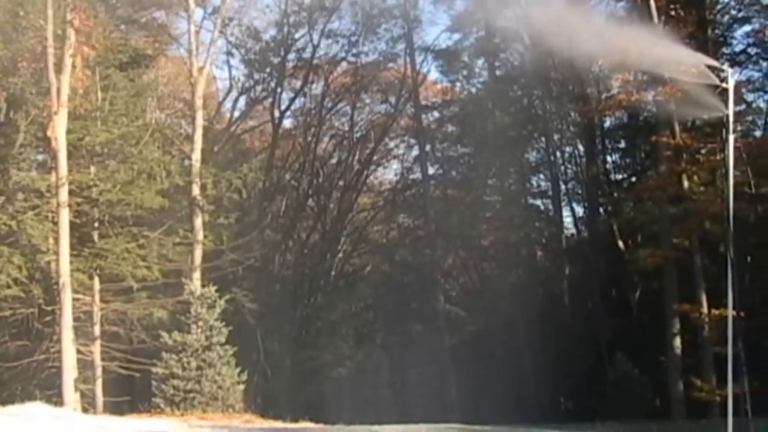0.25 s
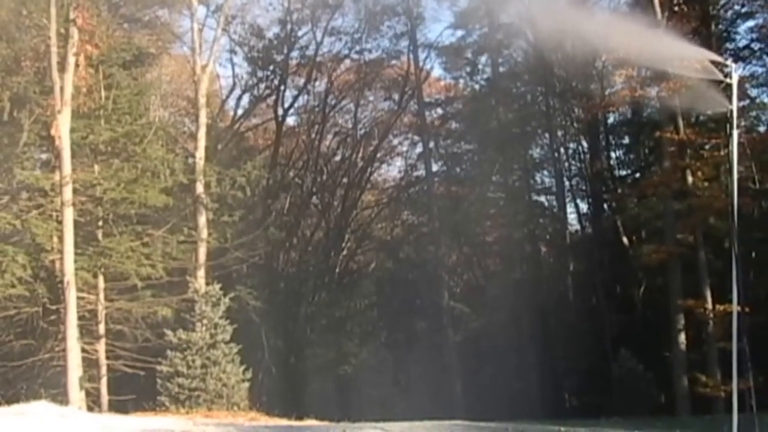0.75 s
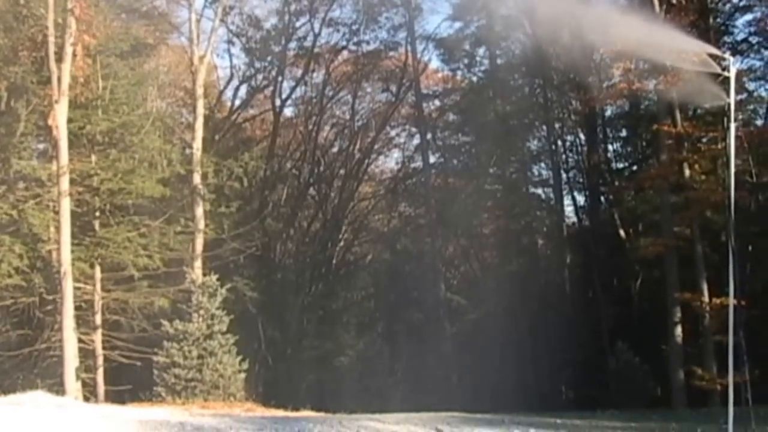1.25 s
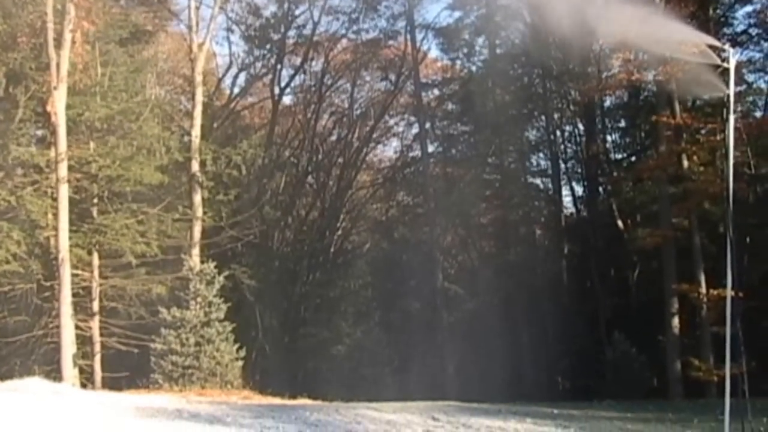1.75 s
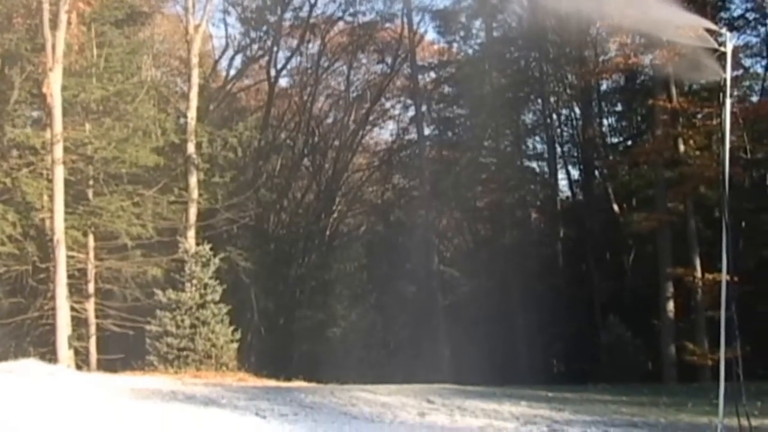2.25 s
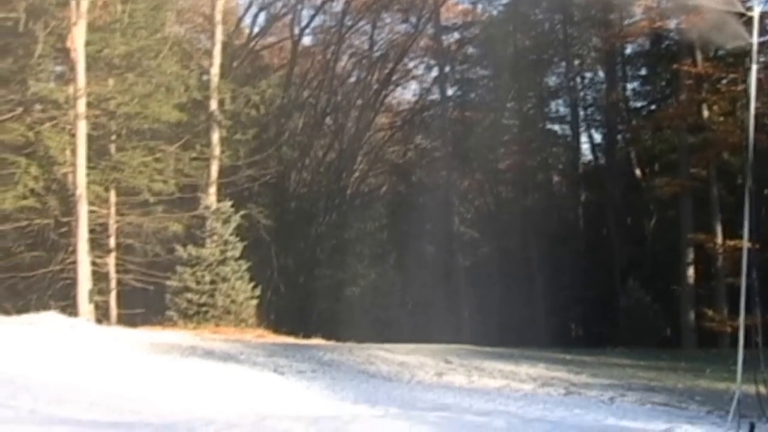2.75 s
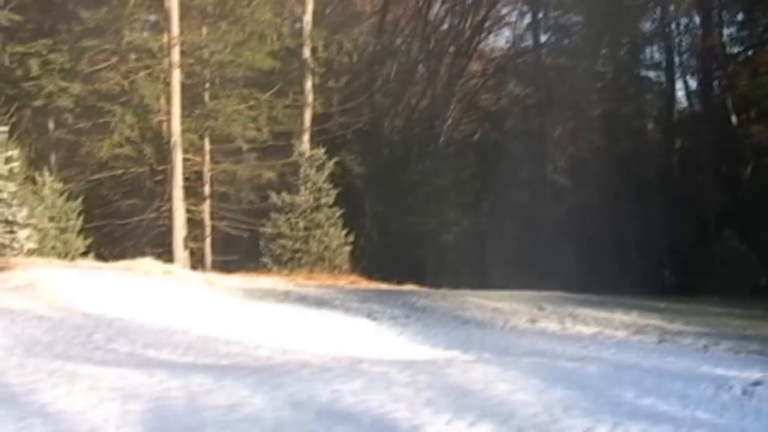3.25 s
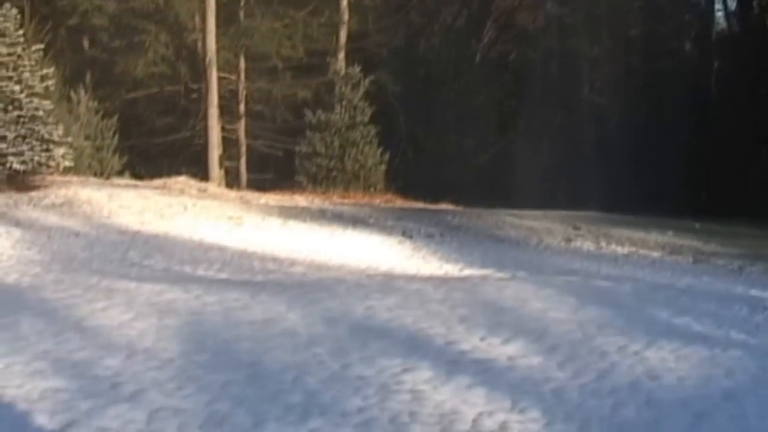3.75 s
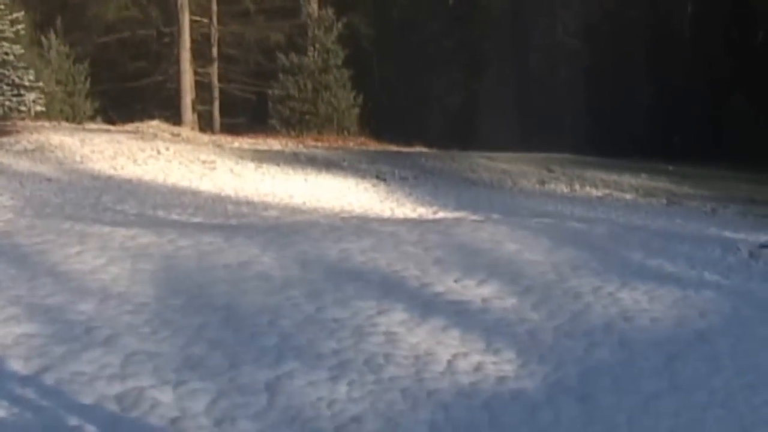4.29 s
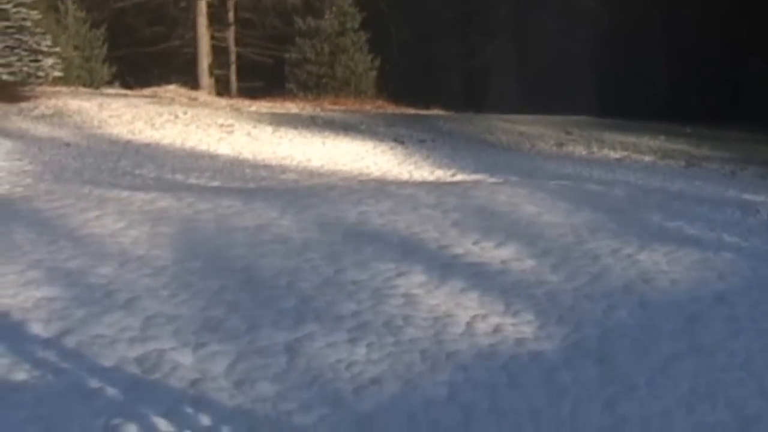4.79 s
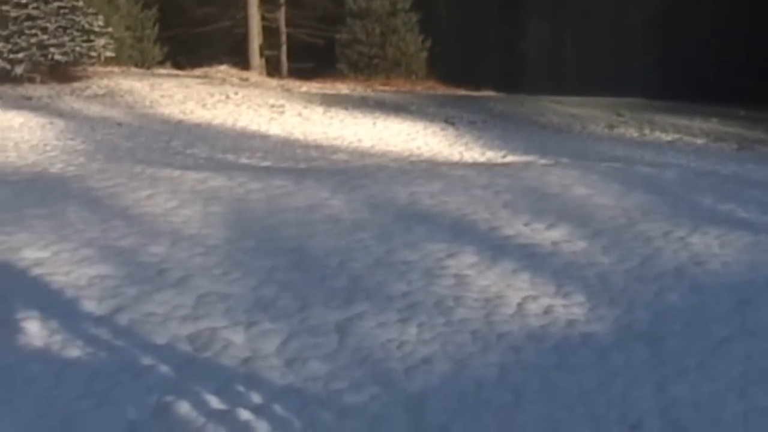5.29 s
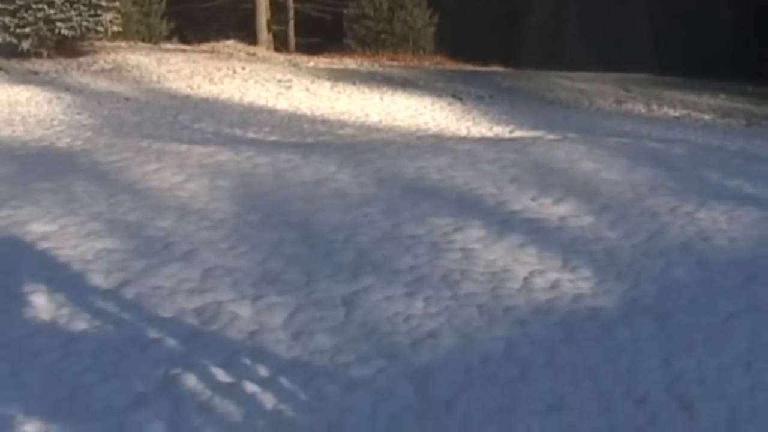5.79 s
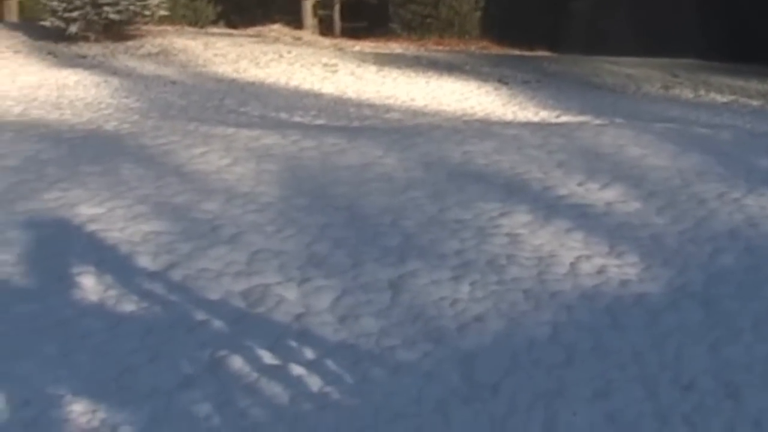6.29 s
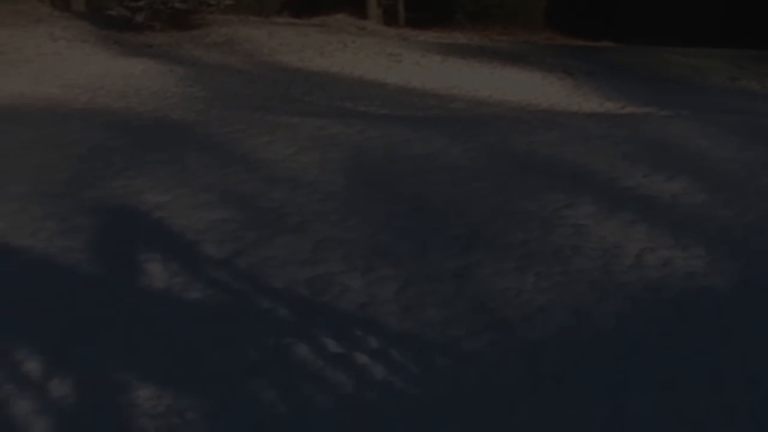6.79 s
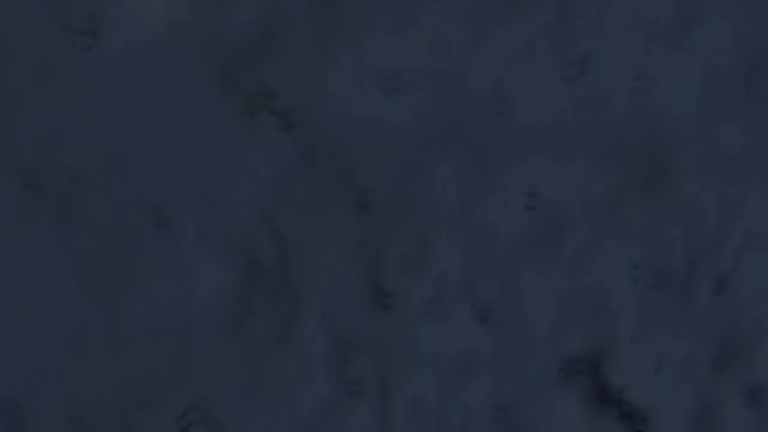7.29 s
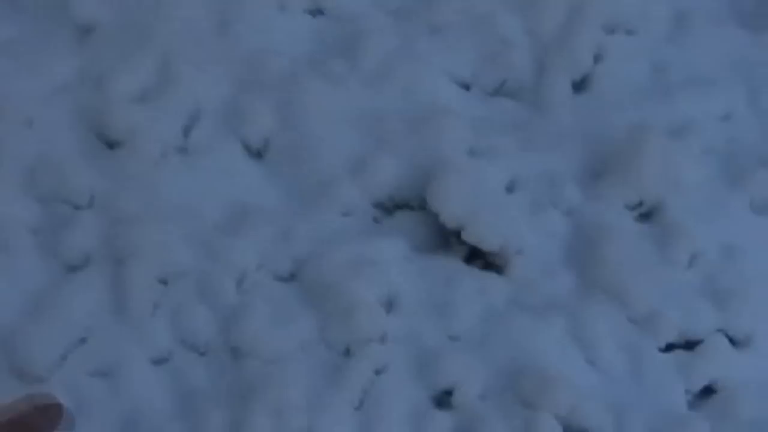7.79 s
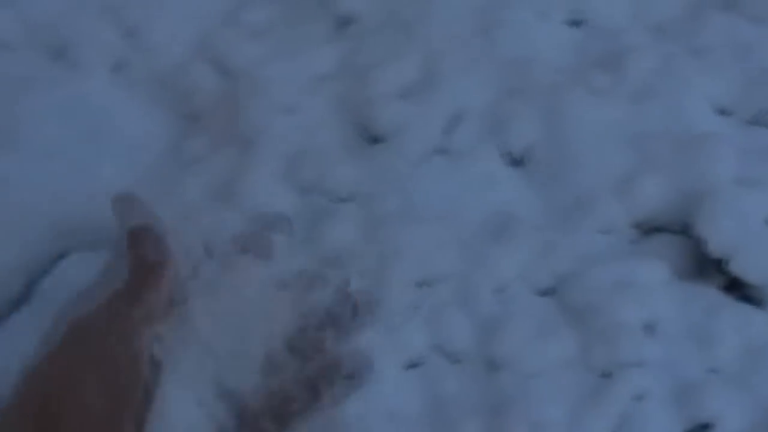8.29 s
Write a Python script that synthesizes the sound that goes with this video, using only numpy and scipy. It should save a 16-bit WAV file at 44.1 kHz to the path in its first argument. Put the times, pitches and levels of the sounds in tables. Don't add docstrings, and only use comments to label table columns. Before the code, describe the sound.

A snowmaking jet hisses loudly and steadily outdoors over faint machine hum, then a boot crunches packed snow and a finger taps the crust.

```python
import sys
import numpy as np
from scipy import signal
from scipy.io import wavfile
from scipy.ndimage import map_coordinates

SR = 44100
rng = np.random.default_rng(int(sys.argv[2]) if len(sys.argv) > 2 else 0)


def makeup_ratio(level_db):
    decades = np.asarray(level_db, float) / 20
    return 10 ** decades


def bounce(signal):
    frames = np.transpose(np.atleast_2d(signal))
    limited = np.clip(frames, -1, 1)
    pcm = np.round(limited * 32767).astype(np.int16)
    wavfile.write(sys.argv[1], SR, pcm)


N = 376613
FRAME, HOP = 1024, 256
RING = 1500


def in_time(rows, s):
    at, *columns = np.transpose(rows)
    return [np.interp(s, at, c) for c in columns]


def at_hz(rows, hz):
    at, *columns = np.transpose(rows)
    return np.array([np.interp(np.log(hz + 1), np.log(at), c) for c in columns])


def drift(rate, count, size, step):
    r = np.exp(-2 * np.pi * rate * step / SR)
    noise = rng.standard_normal((count, size + 300))
    slow = signal.lfilter([1], [1, -2 * r, r * r], noise)[:, 300:]
    return slow / slow.std(axis=1, keepdims=True)


def ring(height, hz, t60, attack):
    t = np.arange(RING) / SR
    swing = height * np.sin(2 * np.pi * hz * t)
    return swing * makeup_ratio(-60 * t / t60) * (1 - np.exp(-t / attack))


def add_at(out, s, knock):
    out[round(s * SR):][:RING] += knock


def wavering_tones(lines):
    frame = np.arange(N) / HOP
    waver = drift(0.88, count=len(lines), size=N // HOP + 2, step=HOP)
    out = 0
    for (cycles, db), row, start in zip(lines, waver, rng.random(len(lines))):
        waver_db = 1.2 * np.interp(frame, np.arange(len(row)), row)
        out = out + makeup_ratio(db + waver_db) * np.sin(2 * np.pi * (cycles + start))
    return np.sqrt(2) * out


def stereo_noise(shape):
    noise = rng.standard_normal((3, N))
    hz, s, (direct, left, right) = signal.stft(noise, SR, nperseg=FRAME, noverlap=FRAME - HOP)
    level_db, balance_db, lag, alike = shape(hz, s)
    alike = np.clip(alike, 0, 1)
    left = np.sqrt(alike) * direct * np.exp(-.5j * lag) + np.sqrt(1 - alike) * left
    right = np.sqrt(alike) * direct * np.exp(.5j * lag) + np.sqrt(1 - alike) * right
    both = np.array([left * makeup_ratio(level_db + balance_db / 2), right * makeup_ratio(level_db - balance_db / 2)])
    return signal.istft(both, SR, nperseg=FRAME, noverlap=FRAME - HOP)[1][:, :N]


# f/Hz, left level/dB, right level/dB
WHINE = [(15068, -57, -66), (15135, -58, -66), (15218, -55, -58), (15285, -53, -53), (15367, -53, -54),
         (15435, -57, -54)]


def electronics_whine():
    t = np.arange(N) / SR
    out = 0
    for hz, left, right in WHINE:
        tone = np.sin(2 * np.pi * (hz * t + rng.random((2, 1))))
        out = out + np.sqrt(2) * makeup_ratio([[left], [right]]) * tone
    return out


# f/Hz, level per Hz/dB
YARD = [(15, -10), (25, 0), (48, -2), (85, -2.5), (130, -5.5), (200, 0.5), (299, -2.5), (370, -16),
        (520, -32), (880, -90)]
YARD_DB = -45.5


def yard_shape(hz, s):
    alike = np.clip(hz / 170 - .15, .02, .5)
    return at_hz(YARD, hz)[0][:, None], 0, 0, alike[:, None]


def yard():
    rumble = stereo_noise(yard_shape)
    return makeup_ratio(YARD_DB) * rumble / rumble.std()


# f/Hz, level/dB
HUM = [(100.3, -55.5), (200.4, -59.5)]


def transformer():
    t = np.arange(N) / SR
    return wavering_tones([(hz * t, db) for hz, db in HUM])


# t/s, strokes per second/Hz
STROKES = [(0, 25.2), (2.05, 23.9), (2.7, 24.8), (3.3, 23.15), (3.96, 23), (4.9, 23.75), (7.05, 23.8),
           (7.07, 23.2), (8.54, 21)]
# multiple, level/dB
PUMP_ORDERS = [(3, -69), (5, -57), (6, -52), (7, -55.5), (8, -56.5), (9, -59), (11, -65)]


def compressor():
    turns = np.cumsum(in_time(STROKES, np.arange(N) / SR)[0]) / SR
    return wavering_tones([(k * turns, db) for k, db in PUMP_ORDERS])


# t/s, level/dB, f/Hz, time to fade by 60 dB/s
TAP = (8.2773, -19, 1050, .012)


def finger_tap():
    out = np.zeros(N)
    s, db, hz, t60 = TAP
    click = ring(makeup_ratio(db + 4.5), hz, t60, attack=.0004)
    soft_give = ring(makeup_ratio(db - 1), 240, t60=.015, attack=.0004)
    add_at(out, s, soft_give - click)
    return out


SETTLE_S, SETTLE_DB, SETTLE_HZ = 0.0059, -8.5, 260
CRACK_DB, CRACK_DB_PER_S = -5.5, -14
CRUMBLE_DB, CRUMBLE_T60_S = -27.5, 0.1
# t/s, level/dB, f/Hz
SLIPS = [(7.385, -12, 260), (7.4134, -12, 320), (7.4187, -12, 270), (7.426, -16, 400), (7.4392, -14, 320),
         (7.4532, -11, 480), (7.4808, -12, 350), (7.4983, -12.6, 300), (7.507, -11.2, 470),
         (7.511, -10.5, 320), (7.5192, -16, 280), (7.5319, -14, 300), (7.5456, -8, 230), (7.6003, -12, 170),
         (7.6152, -12, 370), (7.629, -11, 370), (7.6459, -12, 290), (7.656, -9, 290), (7.667, -9, 330),
         (7.678, -10, 340), (7.6932, -13, 310), (7.7, -12, 370), (7.7098, -9, 280), (7.7221, -13, 420),
         (7.7502, -6.5, 285), (7.762, -16, 320), (7.7903, -8, 285), (7.8405, -12, 340), (7.8453, -16, 420),
         (7.8903, -10.5, 280)]


def boot():
    out, kicks = np.zeros(N), np.zeros(N)
    for (s, db, hz), chance in zip(SLIPS, rng.standard_normal((len(SLIPS), 4))):
        crack_db = db + CRACK_DB + CRACK_DB_PER_S * (s - SLIPS[0][0]) + 3.3 * chance[0]
        crack_hz = 780 * np.exp(0.23 * chance[1])
        later = s + SETTLE_S * np.exp(0.305 * chance[2])
        settle_db = db + SETTLE_DB + 2.5 * chance[3]
        add_at(out, s, ring(makeup_ratio(db), hz, t60=4.0 / hz, attack=0.00039))
        add_at(out, s, ring(makeup_ratio(crack_db), crack_hz, t60=0.0093, attack=0.00023))
        add_at(out, later, ring(makeup_ratio(settle_db), SETTLE_HZ, t60=3.7 / SETTLE_HZ, attack=0.00039))
        kicks[round(s * SR)] = makeup_ratio(db)
    out = signal.sosfilt(signal.butter(3, 155, "high", fs=SR, output="sos"), out)
    grains = (rng.random(N) < 300 / SR) * rng.standard_normal(N)
    grains = signal.sosfilt(signal.butter(2, [180, 900], "band", fs=SR, output="sos"), grains)
    trickle = signal.lfilter([1], [1, -makeup_ratio(-60 / (CRUMBLE_T60_S * SR))], kicks + 1e-18)
    return out + makeup_ratio(CRUMBLE_DB) * trickle * grains / grains.std()


# changes per second/Hz, level shared by all pitches/dB, level in patches/dB
SPUTTER = [
    (14, .5, .5),
    (35, 0.46, .5),
]
# f/Hz, share 0-1
SPUTTER_DEPTH = [(300, .1), (2000, 0.088), (4500, 0.49), (8000, 0.93), (15000, 0.57)]


def sputter(hz, s):
    patch = np.linspace(0, 23, len(hz))
    grid = np.meshgrid(patch, np.arange(len(s)), indexing="ij")
    sputter_db = 0
    for rate, shared_db, patchy_db in SPUTTER:
        rows = drift(rate, count=25, size=len(s), step=HOP)
        patches = map_coordinates(rows[1:], grid, order=1)
        sputter_db = sputter_db + shared_db * rows[0] + patchy_db * patches
    return at_hz(SPUTTER_DEPTH, hz)[0][:, None] * sputter_db


PALM_S, PALM_WIDTH_S, PALM_MS, PALM_DB, PALM_HZ = 8.3, .07, 1.48, 6.5, 8500


def palm_mirror(pitch, s):
    palm = np.exp(-((s - PALM_S) / PALM_WIDTH_S) ** 2 - ((pitch - PALM_HZ) / 2500) ** 2)
    return PALM_DB * palm * np.cos(2 * np.pi * pitch * PALM_MS / 1000 + 1.0)


BOUNCE_LEFT = 1.2
STILL_AIR = 0.29
SHIELD_HZ, SHIELD_SHARE = 1300, 0.73
# f/Hz, level per Hz/dB, left-right level/dB, left lag/rad, left-right likeness 0-1
FACING_GUN = [(500, -12.7, -1.7, 0.2, 0.59), (1300, -10.4, -1.0, 0.3, 0.57), (2000, -9.5, -3.1, 0.3, 0.5),
              (2700, -7.0, -0.9, 0.3, 0.69), (4200, -4.7, -1.3, 0.5, 0.67), (5100, -6.1, -0.3, 0.5, 0.56),
              (5900, -4.8, 3.2, 1.1, 0.58), (7300, -1.4, -2.4, 1.2, 0.73), (8300, -2.7, -1.4, 1.5, 0.75),
              (9400, 0.6, -5.1, 1.3, 0.82), (10400, -0.9, -1.7, 1.1, 0.83), (11300, -3.1, 1.3, 1.5, 0.82),
              (13300, -7.3, -2.1, 1.8, 0.72), (14800, -9.7, -0.4, 1.5, 0.59)]
TILTED_DOWN = [(500, -12.7, -1.0, 0.3, 0.36), (1300, -10.9, -0.1, 0.7, 0.51), (2000, -9.3, -2.6, 0.7, 0.39),
               (2700, -7.5, -2.2, 0.5, 0.62), (4200, -4.0, -0.3, 1.1, 0.78), (5100, -5.4, -3.9, 1.4, 0.58),
               (5900, -7.2, 0.7, 1.1, 0.45), (7300, -1.0, 0.8, 2.2, 0.86), (8300, -2.4, -0.6, 2.4, 0.85),
               (9400, -2.7, 3.0, 2.5, 0.8), (10400, -3.2, -0.1, 3.0, 0.81), (11300, -4.0, -2.4, 2.9, 0.83),
               (13300, -9.2, -0.8, 3.0, 0.73), (14800, -10.5, -0.8, 3.1, 0.7)]
TURNED_AWAY = [(500, -12.3, -1.2, 0.6, 0.39), (1300, -10.5, -1.3, 0.8, 0.5), (2000, -9.4, -3.0, 0.9, 0.31),
               (2700, -7.4, -3.5, 0.6, 0.62), (4200, -4.4, -1.6, 1.7, 0.75), (5100, -3.8, -3.9, 1.9, 0.56),
               (5900, -4.5, -1.3, 2.4, 0.53), (7300, -1.8, -0.3, 2.1, 0.72), (8300, -3.3, 2.6, 2.4, 0.8),
               (9400, -2.3, 3.7, 3.2, 0.85), (10400, -3.1, 4.0, 3.7, 0.82), (11300, -4.5, 1.0, 3.9, 0.79),
               (13300, -9.5, 0.3, 4.0, 0.56), (14800, -10.4, 1.2, 4.0, 0.57)]
BENDING = [(500, -12.5, -0.8, 0.7, 0.42), (1300, -10.2, -1.9, 0.5, 0.31), (2000, -7.0, 0.1, 1.4, 0.45),
           (2700, -7.2, -3.2, 1.6, 0.28), (4200, -7.1, -1.4, 3.0, 0.41), (5100, -5.8, -0.8, 3.3, 0.56),
           (5900, -7.2, -1.5, 3.7, 0.51), (7300, -4.8, -2.1, 3.9, 0.61), (8300, -4.5, -1.7, 4.0, 0.49),
           (9400, -3.7, -3.3, 4.6, 0.43), (10400, -8.3, -2.5, 4.1, 0.27), (11300, -9.7, -1.5, 3.9, 0.28),
           (13300, -11.4, -2.7, 4.5, 0.41), (14800, -14.1, -0.5, 2.9, 0.17)]
OVER_SNOW = [(500, -13.6, -0.8, 0.8, 0.41), (1300, -10.1, -1.7, 0.7, 0.21), (2000, -7.5, 1.7, 1.5, 0.46),
             (2700, -8.0, -3.4, 2.5, 0.41), (4200, -6.5, 0.0, 2.9, 0.45), (5100, -5.0, -0.3, 3.2, 0.66),
             (5900, -5.3, -0.9, 3.3, 0.53), (7300, -3.7, -1.4, 3.7, 0.6), (8300, -3.0, -1.0, 3.6, 0.48),
             (9400, -2.5, -5.2, 4.4, 0.37), (10400, -6.4, -3.2, 4.4, 0.42), (11300, -10.0, -2.8, 4.4, 0.31),
             (13300, -11.2, -2.1, 4.3, 0.39), (14800, -13.7, -1.2, 3.6, 0.19)]
# t/s, attitude 0-4 in the order above, level won by leaning out of the body's shadow/dB
HAND = [(0, 0.01, 0.2), (.8, .02, 0), (2.5, 0.069, 0), (3, 0.41, 0), (3.6, 0.89, .4), (5.2, 1.22, -0.25),
        (6, 1.34, 0), (6.6, 1.92, 0), (7.05, 2.1, 0.5), (7.07, 3.2, -0.1), (7.5, 2.75, 1),
        (7.66, 3.45, 0.5), (7.85, 3.7, 0), (8, 3.3, -0.4), (8.15, 3.95, 0), (8.32, 4, -0.1),
        (8.42, 3.95, -0.2), (8.54, 3.95, 0)]
# attitude 0-4, level/dB, share of echo off the snow 0-1
REACH = [
    (0, -18, 0),
    (1, -19.5, 0.04),
    (2, -20.1, .05),
    (3, -21.5, .03),
    (4, -20, 0.1),
]
# f/Hz, level/dB
YARD_RIPPLE = [(300, -0.2), (380, -4), (530, 3.5), (660, -1.5), (800, 2.2), (910, -0.9), (1030, 3),
               (1170, -0.5), (1520, 2.8), (1950, -0.55), (2330, 2.2), (2520, -0.1), (2800, 1.85),
               (3200, 0.5)]
# t/s, delay/ms, depth/dB
CROUCH = [(7.07, 1.2, 0), (7.3, 1.05, -0.2), (7.6, 1.26, -0.5), (7.9, 1.296, 1.5), (8.54, 1.23, 2)]


def jet_shape(hz, s):
    pitch = hz[:, None]
    attitude, lean_db = in_time(HAND, s)
    poses = [at_hz(p, hz) for p in (FACING_GUN, TILTED_DOWN, TURNED_AWAY, BENDING, OVER_SNOW)]
    weights = [np.clip(1 - abs(np.clip(attitude, 0, 4) - k), 0, 1) for k in range(5)]
    level_db, balance_db, lag, alike = sum(p[:, :, None] * w for p, w in zip(poses, weights))
    level_db = level_db - 10 * np.log10(1 + (260 / (pitch + 1)) ** 5.2)
    power = np.mean(makeup_ratio(2 * level_db) * (pitch < 16000), axis=0)
    level_db = level_db - 10 * np.log10(power)

    delay_ms, depth_db = in_time(CROUCH, s)
    crouching = s > CROUCH[0][0]
    comb = np.cos(2 * np.pi * pitch * delay_ms / 1000 - 1.4) * np.exp(-(pitch / 5500) ** 2)
    shield = SHIELD_SHARE / (1 + (pitch / SHIELD_HZ) ** 6)
    ripple_db = at_hz(YARD_RIPPLE, hz)[0][:, None]
    level_db = level_db + np.where(crouching, depth_db * (comb - shield), ripple_db)
    alike = alike + crouching * 0.058 * depth_db * comb
    balance_db = balance_db + crouching * BOUNCE_LEFT * depth_db * comb
    alike = alike + STILL_AIR * weights[0] * (1 - alike) * np.clip(pitch / 2000 - 1, 0, 1)

    level_db = level_db + palm_mirror(pitch, s) + sputter(hz, s)
    level_db = level_db + in_time(REACH, attitude)[0] + lean_db
    return level_db, balance_db, lag, alike


# delay/ms, left gain, right gain
ECHOES = [(1.24, 1.05, 0.1), (1.54, -.3, -0.45), (6.38, .4, .7)]


def jet():
    hiss = stereo_noise(jet_shape)
    attitude = in_time(HAND, np.arange(N) / SR)[0]
    share = in_time(REACH, attitude)[1]
    echoes = 0
    for ms, left, right in ECHOES:
        echoes = echoes + np.roll(hiss, round(ms * SR / 1000), axis=1) * [[left], [right]]
    return hiss + share * echoes


def scene():
    machines = transformer() + compressor()
    machines = makeup_ratio(.6) * np.array([machines, np.roll(machines, 30)])
    snow = (boot() + finger_tap()) * makeup_ratio([[.4], [-.4]])
    return yard() + machines + snow + jet()


def low_pass(x):
    return signal.sosfilt(signal.butter(12, 16064, fs=SR, output="sos"), x)


def record(dry):
    top_cut = signal.ellip(12, .3, 80, 15700, fs=SR, output="sos")
    mix = signal.sosfilt(top_cut, dry + electronics_whine())
    return low_pass(mix)


dry = scene()
out = record(dry)
bounce(out)
```